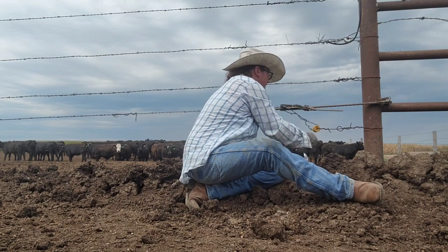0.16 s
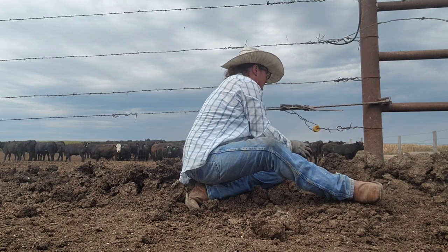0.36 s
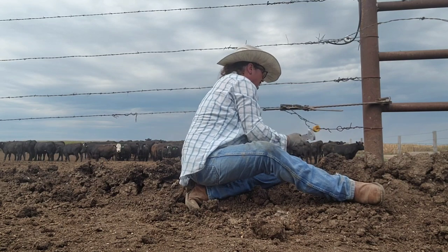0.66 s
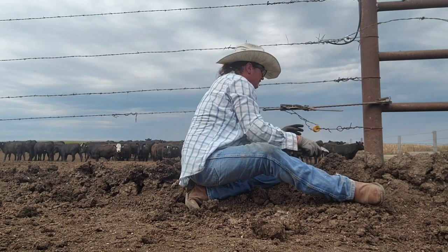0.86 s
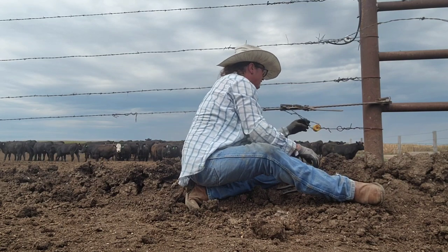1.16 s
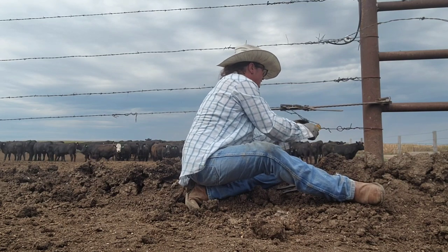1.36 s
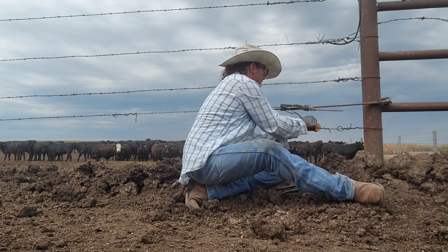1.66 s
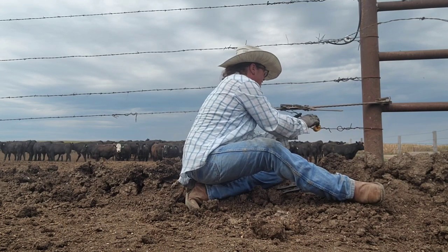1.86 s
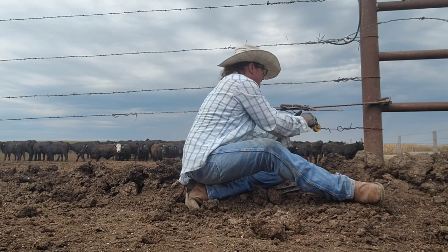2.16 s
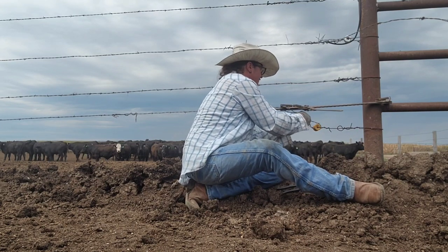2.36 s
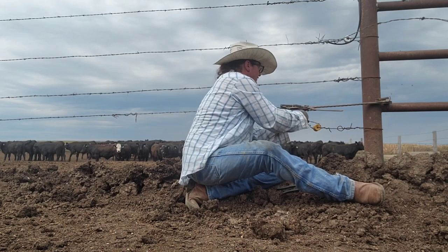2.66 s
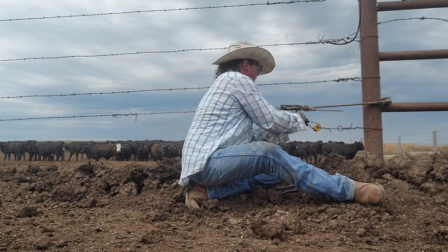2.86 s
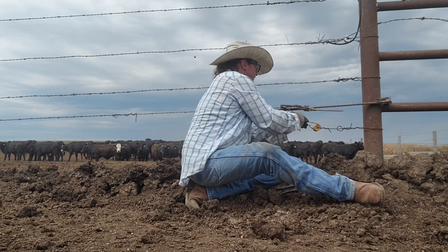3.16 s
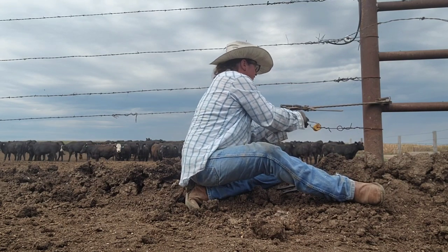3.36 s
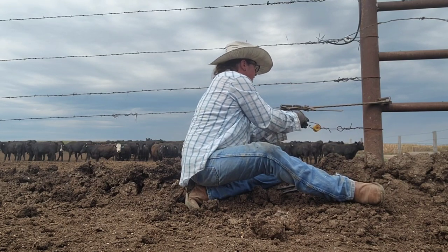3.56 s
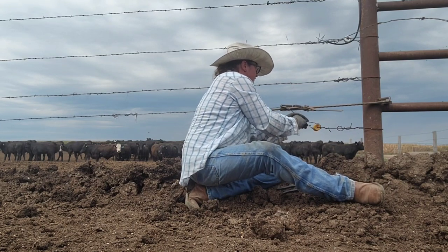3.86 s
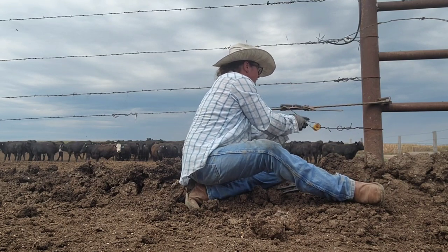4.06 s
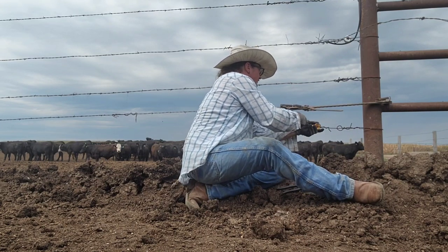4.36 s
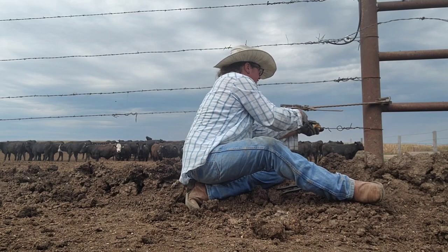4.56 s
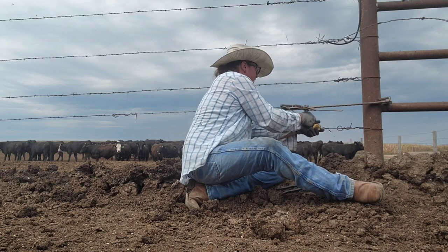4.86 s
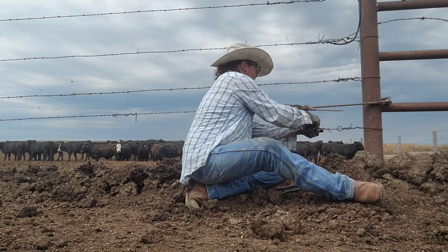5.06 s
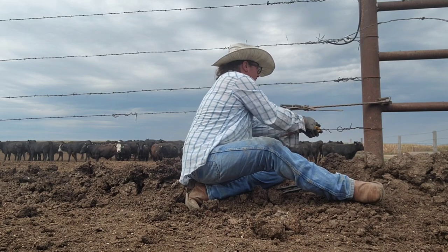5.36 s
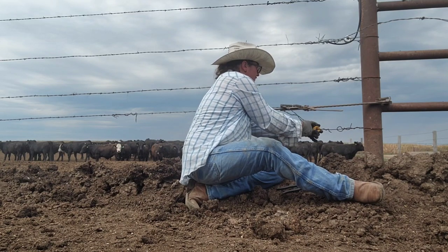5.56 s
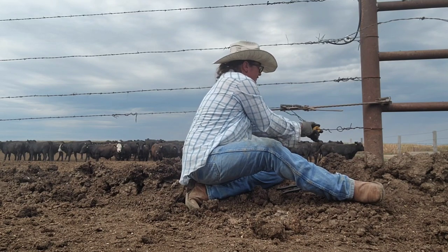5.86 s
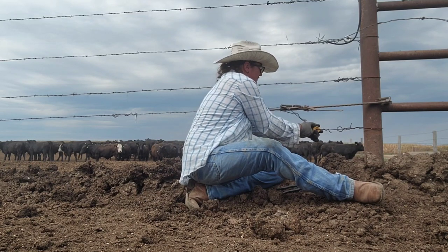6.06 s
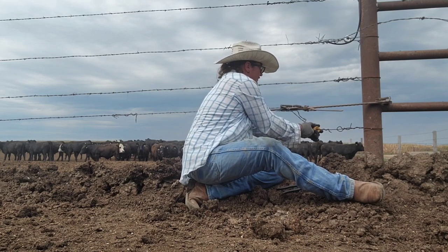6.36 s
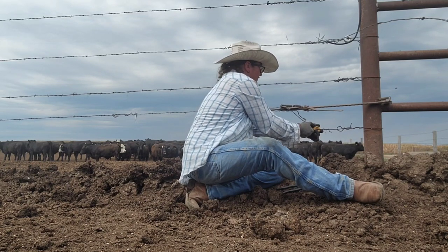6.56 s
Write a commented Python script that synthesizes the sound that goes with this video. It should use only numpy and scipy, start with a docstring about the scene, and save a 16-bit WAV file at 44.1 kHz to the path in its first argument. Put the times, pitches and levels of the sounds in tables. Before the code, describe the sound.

Pliers click and scrape on barbed wire outdoors, over a distant idling engine and light wind rumbling on the microphone.

```python
"""Fence mending in an open paddock, a few metres from a phone with two microphone openings (ports).
From the start a distant engine idles, light wind buffets each port, and a wide outdoor hiss holds a
faint whirr. Pliers click and scrape on barbed wire, making the steel ring, with dull knocks near 1 s.
The wind puffs harder from 2 to 4 s. Sharp clicks come at 3.2 s and, loudest, at 4.6 s; lighter clicks
and faint knocks follow until about 6 s, and the engine's hum swells at the end."""
import sys
import numpy as np
from scipy import signal
from scipy.fft import rfft, irfft
from scipy.io import wavfile
from scipy.ndimage import uniform_filter1d

SR = 44100
rng = np.random.default_rng(int(sys.argv[2]) if len(sys.argv) > 2 else 0)


def wrap_up_sound(samples):
    """Save the sound to the file named by the first command line argument, as 16-bit audio."""
    columns = np.atleast_2d(samples).T
    # keep every value between -1 and 1, then stretch to whole-number steps
    tamed = np.clip(columns, -1, 1)
    steps = np.round(tamed * 32767).astype(np.int16)
    wavfile.write(sys.argv[1], SR, steps)


N = 296352


def steel_clicks():
    """Pliers strike the wire and it rings, then scrapes and crunches; a tight grip cuts each short."""
    # steel hitting steel: (time [s], blow level [dB], strongest pitch [Hz], drop away from that pitch
    # [dB per octave], freedom to ring [0-1], scrape against blow [dB], crunch against blow [dB])
    clicks = [(.081, -53, 5160, 12, 0.26, 13, -17), (0.0876, -42.5, 5600, 52, 0.11, -1, -36),
              (.6305, -52, 6500, 23, 0.3, 2, -29), (0.9703, -48, 3000, 7, 0.53, 4.5, -30),
              (.985, -49, 2935, 8, 0.32, 9, -23), (1.015, -54.5, 6500, -2, 0.8, 4, -34),
              (1.05, -49.5, 5920, 28, 0.08, 2.5, -29), (1.072, -48, 4700, 2, 1, 4, -31),
              (1.0797, -38.5, 3600, 96, 0.87, -1.5, -39), (1.1052, -33, 6600, 25, 0.07, -12, -22),
              (1.542, -56.5, 3560, 93, 0.9, -16, -46), (2.92, -53.5, 4040, 7, 0.9, -9, -39),
              (3.208, -54.5, 5700, 31, 1, 2.5, -25), (3.2266, -39, 5650, 32, 0.6, -3, -28),
              (3.24, -56.5, 1600, 29, 0.61, 3.5, -45), (3.236, -51, 8000, 29, 0.4, 7, -47),
              (3.231, -49, 3680, 27, 0.6, -10, -30), (3.2386, -33, 5150, 25, 0.66, -11, -29),
              (3.25, -41, 5500, 8, 0, -2, -39), (3.41, -53.5, 3600, 78, 0.8, 2.5, -38),
              (3.411, -60.5, 1730, 18, 1, 12.5, -28), (3.467, -60.5, 5430, 90, 0.7, -12, -42),
              (3.576, -45.5, 5450, 35, 1, -5.5, -42), (3.577, -54, 1600, 42, 1, -2, -45),
              (3.578, -61.5, 3260, 49, 1, -0.5, -42), (3.604, -51.5, 5020, 19, 1, -4, -40),
              (3.621, -61, 1630, 20, 0.55, 5, -28), (4.11, -57.5, 4460, 19, 0.2, -8, -45),
              (4.484, -50.5, 4600, 43, 0.3, -4, -37), (4.5659, -27, 5800, 23.5, 0.44, -13.5, -29.5),
              (4.573, -42.5, 4250, 17, 0.85, 1.5, -27), (4.5902, -31, 5750, 23, 0.4, -6.5, -22.5),
              (4.598, -48.5, 6200, 12, 0.43, 4, -12.5), (4.61, -49.5, 3700, 26, 0.7, -1, -35),
              (4.82, -48.5, 2030, 45, 0.2, -3, -40), (4.926, -55.5, 4060, 23, 0.6, -1.5, -42),
              (4.955, -60, 3610, 48, 0.8, -7, -44), (5.026, -49, 5700, 16, 0.75, -4.5, -35),
              (5.035, -56.5, 1690, 33, 0.6, 3.5, -44), (5.124, -59.5, 7060, -2, 0.4, 8, -27),
              (5.401, -56.5, 5000, 19, 0, -3, -28), (5.772, -55.5, 3700, 36, 0.33, -4, -43),
              (5.932, -57, 5960, 30, 1, -12, -31), (5.939, -54.5, 4770, 33, 0.8, -1, -36),
              (5.945, -55, 4020, 60, 0.7, -2, -38), (5.951, -55.5, 1990, 28, 0.5, -3, -47),
              (6.11, -45, 5200, 12, 0.08, 0.5, -23), (6.111, -55, 2000, 28, 0.7, -17, -46),
              (6.119, -52, 3580, 26, 0.3, -6, -36)]
    # tones the wire and pliers ring with: (pitch [Hz], level [dB], time to fade by 60 dB [s])
    steel_tones = [(1094, 3.5, 0.099), (1606, -4.5, 0.22), (2016, 8.5, 0.066), (2550, -13.5, 0.016),
                   (3250, -8.5, 0.082), (3483, -4, 0.12), (3670, -1.5, 0.097), (4073, -3.5, 0.13),
                   (4738, 5, 0.089), (5050, -4.5, 0.062), (5520, -6.5, 0.044), (5625, -3, 0.14),
                   (5900, -6.5, 0.14), (5910, -5.5, 0.091), (6530, -12.5, 0.07), (7030, -7.5, 0.082),
                   (7170, -15.5, 0.055), (7830, -7.5, 0.069), (8170, -20.5, 0.045), (9300, -31.5, 0.018),
                   (11800, -30.5, 0.035)]
    # tone colour of the crunch: (frequency [Hz], level [dB])
    crunch_colour = [(6000, -14), (7500, 5.5), (9400, 1), (10500, -7), (11900, 0), (13500, -5),
                     (15300, 1.5)]
    grip_damping, snap_s, crack_s = 9, .00091, .0012
    out, t = np.zeros((2, N)), np.arange(4096) / SR
    hz, db, ring_s = np.array(steel_tones).T[:, :, None]
    signs = (-1) ** np.arange(len(hz))[:, None]
    crunch_gain = gain(read_at(crunch_colour, np.fft.rfftfreq(len(t), 1 / SR)))
    end_fade = np.clip((t[-1] - t) / .02, 0, 1)
    noises = rng.standard_normal((len(clicks), 4, len(t)))
    scatters = rng.standard_normal((len(clicks), 2, len(hz), 1))
    for click, noise, (detune, scatter) in zip(clicks, noises, scatters):
        start, blow_db, strongest_hz, drop_db, free, scrape_db, crunch_db = click
        tight = (1 - free) ** 3
        tone_db = db - drop_db * np.abs(np.log2(hz / strongest_hz))
        # each tone spreads unevenly, so it reaches the two ports out of step
        phase = np.array([.4 * scatter, 0 * scatter])
        tones = ring(t, hz * (1 + .0044 * detune), max(free, .03) * ring_s, phase)
        snap = 1 + 3.7 * tight * np.exp(-t / snap_s)
        blow = (gain(tone_db + 1.5 * scatter) * tones).sum(1) * soft_start(t, .0011) * snap
        # tiny slips reach the ports by partly different paths and shake the same tones, now gripped
        slips = (.55 * noise[0] + noise[1:3]) * gain(3 * np.repeat(noise[3, ::32], 32))
        rub = slips * np.exp(-t / (.0072 + .013 * free)) * (1 - np.exp(-t / .0079))
        short_tones = ring(t[:1024], hz * (1 + .025 * detune), ring_s / grip_damping)
        gripped = (gain(.5 * tone_db) * short_tones * signs).sum(0)
        scrape = signal.fftconvolve(rub, gripped[None])[:, :len(t)] / np.sqrt(np.sum(gripped ** 2))
        rasp = gain(-7.5) * band(rub, 1300, 3600)
        # a tightly gripped blow opens with a crack
        crack = 3.8 * tight * noise[0] * np.exp(-t / crack_s)
        crunch = (slips * np.exp(-t / (.0042 + .018 * free)) + crack) * soft_start(t, .001)
        crunch = band(irfft(rfft(crunch) * crunch_gain), 6000, 14000)
        sound = blow / np.abs(blow[1]).max() + gain(scrape_db) * (scrape + rasp) / 2
        sound += gain(crunch_db) * crunch
        add(out, start, sound * gain(blow_db) * end_fade)
    return out


def dull_knocks():
    """A soft blow rings one dull tone, with gritty noise near that pitch; higher knocks are grittier."""
    # knocks of tool, post and ground: (time [s], level [dB], pitch [Hz], time to fade by 60 dB [s])
    knocks = [(.081, -28, 265, 0.021), (1.048, -35.5, 320, 0.037), (1.051, -44, 630, 0.016),
              (1.081, -33.5, 295, 0.087), (1.083, -30, 540, 0.0075), (1.108, -31, 716, 0.0089),
              (1.1086, -17.5, 158.5, 0.051), (1.109, -29, 314, 0.058), (4.59, -62.5, 702, 0.3),
              (5.415, -62, 765, 0.1), (5.455, -65, 760, 0.091), (5.489, -60.5, 950, 0.1),
              (5.492, -59.5, 770, 0.064), (5.548, -62, 790, 0.06), (5.69, -56.5, 826, 0.048),
              (5.83, -56, 780, 0.023), (5.962, -62, 577, 0.13), (6.13, -63, 577, 0.34)]
    out, t = np.zeros(N), np.arange(8192) / SR
    for start, db, hz, ring_s in knocks:
        grit = 1.1 * min(hz / 800, 1) ** 2 * band(rng.standard_normal(len(t)), hz / 1.15, hz * 1.15)
        grit *= np.exp(-np.log(1000) * t / ring_s) * (1 - np.exp(-t / .0028))
        add(out, start, gain(db) * (ring(t, hz, ring_s) + grit) * soft_start(t, .47 / hz))
    return np.array([out, out])


def wind():
    """Swirls of air, partly shared by the ports, buffet and rumble; strong gusts add a higher flutter."""
    # wind on the ports: (time [s], strength [dB], left minus right [dB])
    gusts = [(0.0, -48.5, 3.5), (0.22, -58.5, 2.5), (1.05, -59.5, 0), (1.65, -60, 0.5), (2.0, -52.5, -5.5),
             (2.2, -54, 5), (2.51, -50, 0.5), (2.72, -49.5, 0), (2.95, -53, 2), (3.5, -53, 1),
             (3.84, -51, -1.5), (3.95, -54, -0.5), (4.87, -58, -1), (5.41, -57, -1), (6.08, -56, 0),
             (6.72, -57.5, -9)]
    db, pan_db = over_time(gusts)
    buffet_db = db + 2.5 * wander(12)
    rumble_db = db - 1 + 2.5 * wander(12)
    flutter_db = buffet_db - 22.5 + .56 * (buffet_db + 36.5)  # grows faster than the buffeting
    pan_db = pan_db + 2 * wander(9.7)
    shared = rng.standard_normal(N)
    out = []
    for side in (.5, -.5):
        swirl = (1.08 * shared + rng.standard_normal(N)) * gain(side * pan_db)
        flutter = rng.standard_normal(N) * gain(side * pan_db + flutter_db + 3.8 * wander(65))
        buffet = band(swirl * gain(buffet_db), 85.4, 139)
        rumble = band(swirl * gain(rumble_db), 28, 66)
        out.append(buffet + band(flutter, 150, 360) + rumble)
    return np.array(out)


def wind_puffs():
    """A single swirl of air hits a port: a few low waves that fall in pitch."""
    # firm puffs: (time [s], level [dB], pitch [Hz], length [waves], left minus right [dB])
    puffs = [(1.933, -33.5, 112, 2.4, -12), (1.98, -30.5, 127, 2.7, -9.5), (1.932, -43.5, 200, 2.6, -11),
             (1.988, -35, 228, 3, -11.5), (2.325, -45.5, 200, 3.3, -9), (2.654, -49.5, 218, 4.8, -10),
             (3.75, -48, 230, 2.6, -12), (3.8, -46.5, 220, 2.1, -16), (3.942, -50, 200, 2.7, -12),
             (.277, -48.5, 232, 2.6, 0), (2.016, -29, 101, 2.8, -12), (2.186, -36.5, 108, 2.7, 12),
             (2.338, -37, 130, 5.6, 13), (2.36, -37, 105.5, 4.6, 15), (2.61, -39, 128, 4.4, -18),
             (2.679, -39.5, 129, 4.8, -19.5), (3.267, -37, 126, 4.9, -7), (3.746, -27, 115, 4.6, -9.5),
             (3.8, -34, 106, 2.8, -17.5), (5.529, -34, 103, 4.5, 4), (5.75, -39, 111.3, 7.3, 17),
             (6.006, -41.5, 107, 2.7, 27), (6.62, -31.5, 109, 2.8, 7.5), (0.212, -42.5, 49.3, 4.6, 8),
             (0.761, -39, 52, 6.2, 5), (0.992, -35.5, 51.7, 3.5, 11), (1.169, -31.5, 62, 2.7, 5),
             (1.901, -36.5, 52, 9.6, 12), (2.148, -37, 52, 4.9, 16), (2.272, -39, 50.4, 3.6, -1),
             (2.415, -39, 51, 5.6, 20), (2.521, -35.5, 51, 5, 6), (2.699, -35.5, 49.5, 4.4, 14.5),
             (2.911, -39.5, 53, 4, -2), (3.236, -36.5, 53.5, 6.5, 11), (3.631, -45, 55.4, 3.9, 19),
             (3.741, -35.5, 53.7, 7.1, -7), (3.882, -34.5, 54, 5.1, -5), (4.401, -40.5, 53, 3.9, 7),
             (5.465, -36, 53.6, 3.9, 10), (5.725, -38.5, 56.1, 8.9, 20), (6.513, -42.5, 51.3, 3.6, 10),
             (6.591, -35, 78, 5.1, 10)]
    out = np.zeros((2, N))
    for start, db, hz, waves, pan_db in puffs:
        progress = np.arange(int(SR * waves / hz)) * hz / SR / waves
        swell = np.sin(np.pi * progress ** .7) ** 2  # peaks early
        falling_tone = np.sin(2 * np.pi * waves * progress * (1.15 - .25 * progress))
        add(out, start, swell * falling_tone * gain(db + pan_db * np.array([[.5], [-.5]])))
    return out


def distant_engine():
    """An idling engine hums at multiples of its firing rate; moving air shifts the hum at each port."""
    # tones of the hum: (multiple of the firing rate, level [dB])
    hum_tones = [(2, -21), (3, -9), (4, -4.5), (5, 2.5), (6, -7), (7, -28.5), (8, -17), (10, -19),
                 (11, -20.5)]
    # loudness of the whole hum: (time [s], level [dB])
    hum_level = [(0, -48.5), (.8, -46.5), (1.6, -50), (2.4, -48), (3.2, -47.5), (4, -48), (4.8, -48),
                 (5.6, -47.5), (6.2, -53.5), (6.72, -41)]
    firing_hz, drift_radians = 17.64, .4
    cycle = 2 * np.pi * np.cumsum(firing_hz * (1 + .0033 * wander(6.6))) / SR
    hum = 0
    for multiple, db in hum_tones:
        level = gain(db + 2.19 * wander(9))
        phase = multiple * cycle + 2 * np.pi * rng.random()
        drift = drift_radians * np.array([wander(5.7), wander(7)])
        hum += level * np.sin(phase + drift)
    return np.sqrt(2) * gain(over_time(hum_level)[0]) * hum


def outdoor_hiss():
    """Wide noise in half-octave bands that swell together and flicker on their own."""
    # tone colour of the hiss: (frequency [Hz], level [dB])
    hiss_colour = [(100, 1), (190, -8.5), (260, -24), (415, -10), (480, -15), (800, -19), (1170, -21.5),
                   (1850, -20.5), (2050, -20), (2500, -21), (5600, -23), (6900, -41), (7500, -39.5),
                   (8900, -63)]
    # how alike left and right sound: (frequency [Hz], likeness [0-1])
    likeness = [(100, 1), (640, 0.69), (1400, 0.26), (3100, 0.0076), (15000, 0.13)]
    hiss_db = -66.5
    hz = np.fft.rfftfreq(N, 1 / SR)
    alike = read_at(likeness, hz)
    shared, opposite = (rfft(rng.standard_normal(N)) * np.sqrt(1 + sign * alike) for sign in (1, -1))
    spectrum = np.array([shared + opposite, shared - opposite])
    spectrum *= gain(read_at(hiss_colour, hz)) * (hz > 100) * (hz < 9500)
    strength = np.sqrt(np.mean(np.abs(spectrum.mean(0)[hz > 300]) ** 2) / N)
    out, swell, octaves = 0, wander(3.6), np.log2(np.maximum(hz, 1) / 100)
    for k in range(15):
        share = np.cos(np.pi / 2 * np.clip(2 * octaves - k, -1, 1)) ** 2
        flicker_db = .3 * swell + (2 - k / 10) * wander(14)  # the far hiss is steadier than the bass
        out += gain(flicker_db) * irfft(spectrum * share, N)
    return out * gain(hiss_db) / strength


def whirr():
    """Narrow bands of noise waver in level; each port hears its own noise."""
    # bands of the whirr: (centre [Hz], width [Hz], level [dB])
    whirr_bands = [(1980, 66, -0.5), (2120, 68, 0.5), (2307, 90, -4.5)]
    # loudness of the whole whirr: (time [s], level [dB])
    whirr_level = [(0, -77.5), (1.2, -77), (2.4, -80.5), (3.4, -80), (4.2, -81), (4.8, -84), (5.5, -80.5),
                   (6.72, -85)]
    out = 0
    for hz, width, db in whirr_bands:
        level = gain(db + 1.2 * wander(9))
        out += level * band(rng.standard_normal((2, N)), hz - width / 2, hz + width / 2, order=1)
    return out * gain(over_time(whirr_level)[0])


def through_ports(sound):
    """Each port colours the sound in its own way, and the right one hears it a little late."""
    # difference in tone colour: (frequency [Hz], left minus right [dB])
    port_colour = [(1000, -1.5), (1700, -0.5), (2400, -6), (3700, -1), (4400, -7.5), (5800, -6.5),
                   (6500, -16.5), (7200, 15.5), (8600, 9), (9900, -1), (10800, 4.5), (15500, 9.5)]
    # extra head start of the left port: (frequency [Hz], phase [radians])
    left_lead = [(2600, 0), (3450, 2), (3800, 2), (4150, 0), (4750, -.7), (5400, 0)]
    right_delay_s = .00016
    hz = np.fft.rfftfreq(N, 1 / SR)
    lean = gain(read_at(port_colour, hz) / 2)
    left = lean * np.exp(1j * read_at(left_lead, hz))
    right = np.exp(-2j * np.pi * hz * right_delay_s) / lean
    return irfft(rfft(sound) * np.array([left, right]), N)


def gain(db):
    """Turn decibels into a multiplier."""
    return 10 ** (np.asarray(db) / 20)


def read_at(table, hz):
    """Read a frequency table at hz, gliding between its rows."""
    row_hz, values = np.transpose(table)
    return np.interp(np.log(np.maximum(hz, 1)), np.log(row_hz), values)


def over_time(table):
    """Stretch each column of a time table to one value a sample."""
    times, *columns = np.transpose(table)
    return [np.interp(np.arange(N) / SR, times, column) for column in columns]


def band(x, lo_hz, hi_hz, order=2):
    """Keep one range of frequencies; white noise comes out about as strong as it went in."""
    sos = signal.butter(order, [lo_hz, hi_hz], "band", fs=SR, output="sos")
    return signal.sosfilt(sos, x) * np.sqrt(SR / 2 / (hi_hz - lo_hz))


def wander(rate_hz):
    """A smooth random curve that strays about 1 either side of zero."""
    hold = int(SR / rate_hz)
    steps = np.repeat(rng.standard_normal(N // hold + 1), hold)
    return 1.84 * uniform_filter1d(uniform_filter1d(steps, hold), hold)[:N]


def ring(t, hz, ring_s, phase=0):
    """A tone that fades by 60 dB in ring_s seconds."""
    return np.sin(2 * np.pi * hz * t + phase) * np.exp(-np.log(1000) * t / ring_s)


def soft_start(t, rise_s):
    """A smooth rise from 0 to 1."""
    return 1 - np.exp(-(t / rise_s) ** 2)


def add(out, start, sound):
    """Mix a sound in at start seconds."""
    i = int(start * SR)
    out[..., i:i + sound.shape[-1]] += sound[..., :N - i]


def scene():
    """The paddock's sounds pass through the ports; the wind blows right on them."""
    paddock = steel_clicks() + dull_knocks() + distant_engine() + outdoor_hiss() + whirr()
    return through_ports(paddock) + wind() + wind_puffs()


def record(dry):
    """The microphones add a faint hiss, the treble flickers faintly, and the phone cuts the very top."""
    hiss_db, treble_db, top_hz = -98, -100, 15750
    hiss = gain(hiss_db) * rng.standard_normal(dry.shape)
    treble = gain(treble_db + 1.5 * wander(40)) * band(rng.standard_normal(dry.shape), 11500, 15500)
    return signal.sosfilt(signal.ellip(10, .2, 70, top_hz, fs=SR, output="sos"), dry + hiss + treble)


dry = scene()
out = record(dry)
wrap_up_sound(out)
```